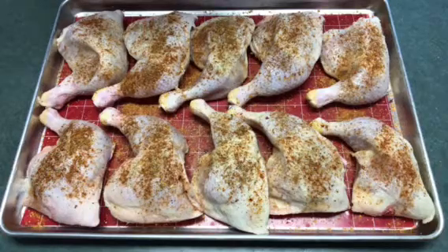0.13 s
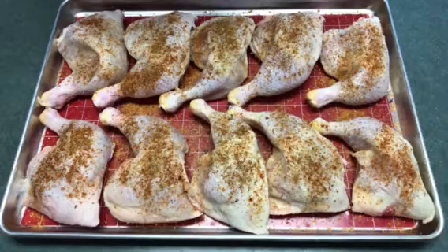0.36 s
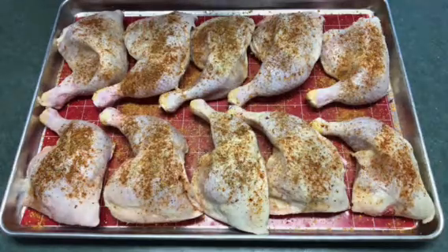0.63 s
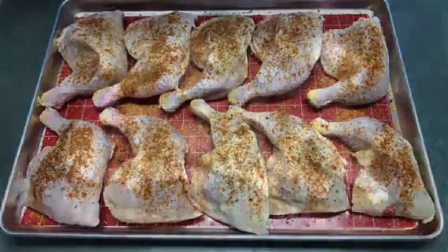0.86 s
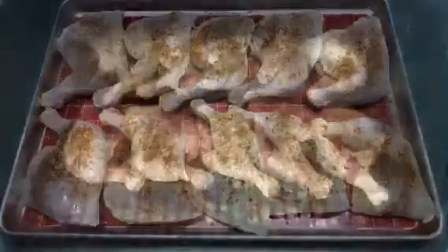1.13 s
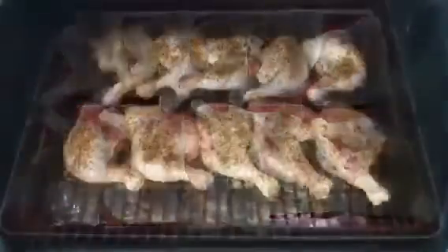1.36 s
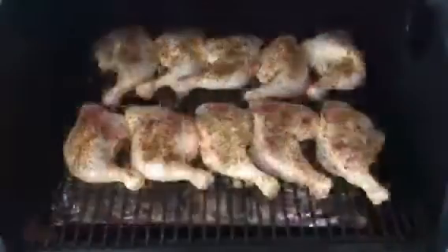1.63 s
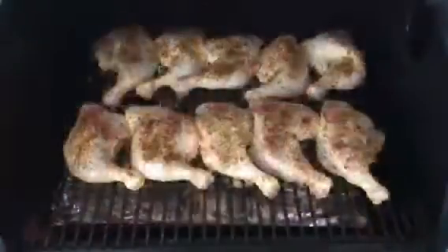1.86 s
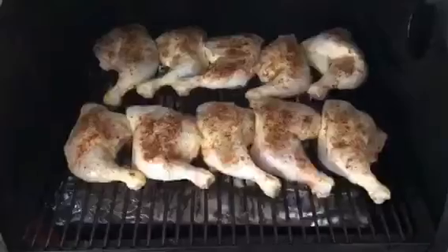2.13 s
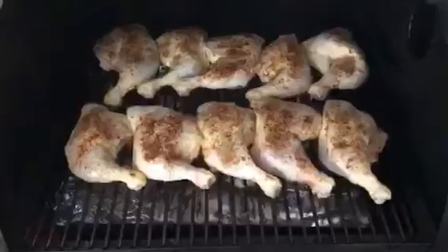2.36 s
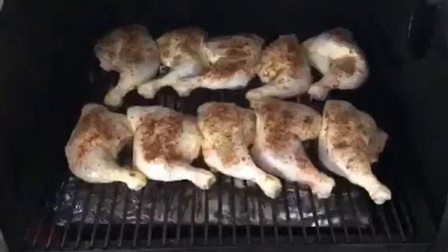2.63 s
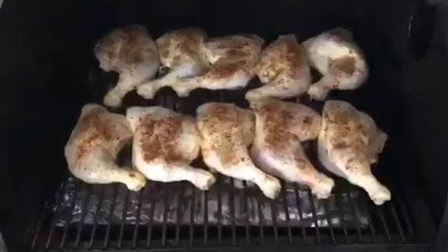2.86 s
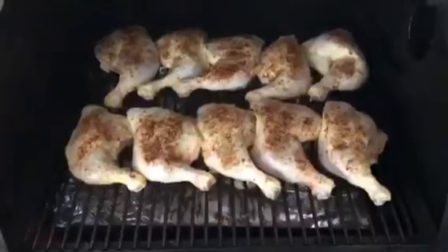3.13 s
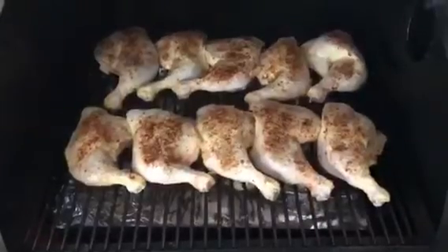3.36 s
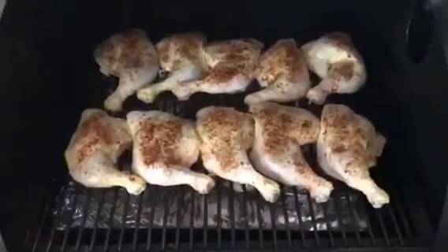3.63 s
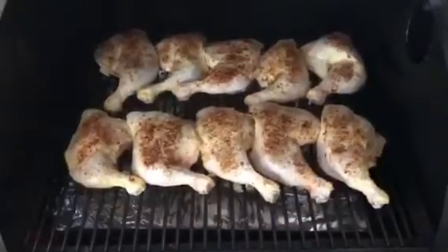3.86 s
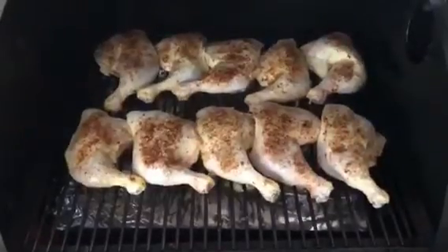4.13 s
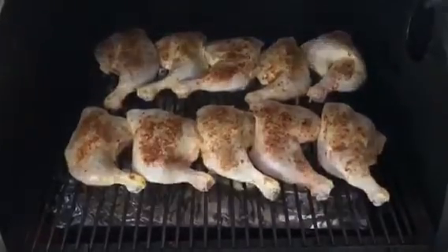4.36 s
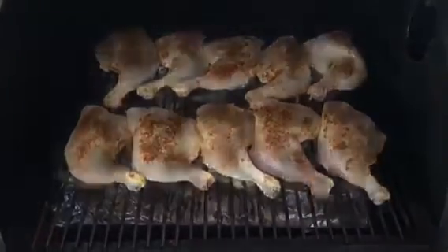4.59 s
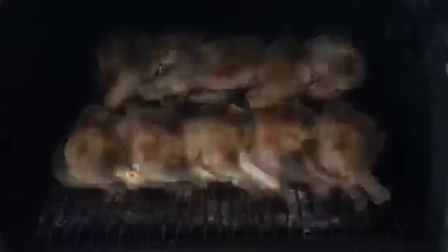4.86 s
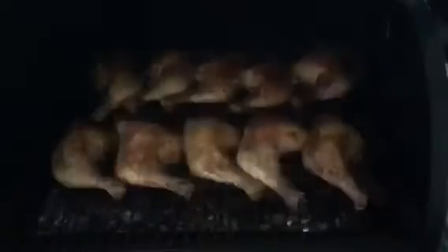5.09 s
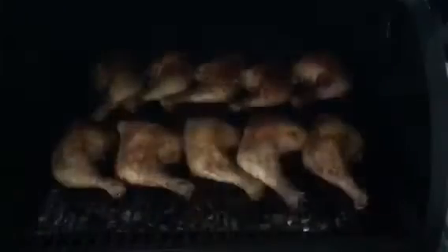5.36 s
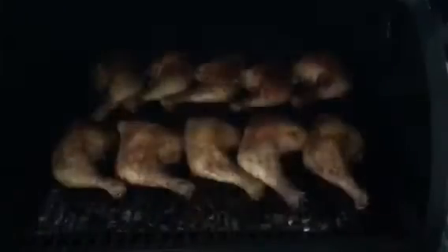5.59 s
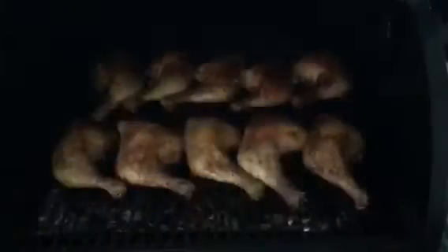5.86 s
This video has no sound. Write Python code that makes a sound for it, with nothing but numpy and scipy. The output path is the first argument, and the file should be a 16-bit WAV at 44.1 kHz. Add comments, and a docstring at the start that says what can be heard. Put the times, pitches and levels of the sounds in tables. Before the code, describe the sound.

For the first 0.6 seconds there is only a very quiet room: soft low room tone, faint appliance hum, a few barely audible gliding chirps, mostly near 0.1-0.3 and 0.4-0.6 seconds, and one tiny tick at 0.2. At about 0.62 a hard cut jumps to a much louder outdoor pellet grill. Flames roar low and steadily, over a wavering, lumpy hum around 140 hertz. Fan-driven air rushes through the duct with hollow midrange resonances and thin fan tones. Fat drops on a hot tray spit in short bright bursts, several each second, with a stronger one near 2.0, over faint fine sizzle. At 4.23 a sharp snap marks another cut: frying hiss and duct air become clearly louder, then the frying slowly eases. Strong spits come near 4.4 and 5.1; the roar swells around 5.1, drops by 5.35, and continues to the end at about 6 seconds.

```python
"""A pellet grill roars outdoors, after a hard cut from a quiet room with faint chirps and one tick.
The fan feeds the fire: the flame roars low, as shaped noise, over a wavering low hum of narrow noise.
Air rushes through the duct: noise with air resonances and narrow fan tones.
Fat on the hot drip tray hisses as dense random puffs and spits in short bright noise bursts.
A later cut to a second shot brings louder frying and duct air."""
import sys
import numpy as np
from scipy import signal
from scipy.fft import rfft, irfft
from scipy.io import wavfile
from scipy.ndimage import uniform_filter1d

SR = 44100
rng = np.random.default_rng(int(sys.argv[2]) if len(sys.argv) > 2 else 0)


def master_out(mix):
    """Clip the mix to full scale and print it as 16-bit PCM to the path in sys.argv[1]."""
    frames = np.transpose(np.atleast_2d(mix))
    ceiling = np.clip(frames, -1, 1)
    pcm = np.round(ceiling * 32767).astype(np.int16)
    wavfile.write(sys.argv[1], SR, pcm)


def makeup_ratio(level_db):
    """Linear amplitude ratio for a level in decibels (20 dB per factor of ten)."""
    decades = np.asarray(level_db, float) / 20
    return 10 ** decades


N = 263786


def rms_one(x):
    """Scale to an rms of 1."""
    return x / np.sqrt(np.mean(x ** 2) + 1e-20)


def in_time(rows):
    """Interpolate each column after the first over the time in the first."""
    time_s, *columns = np.transpose(rows)
    return [np.interp(np.arange(N) / SR, time_s, column) for column in columns]


def colour(points, modes=()):
    """Gain per FFT bin: a smooth spectrum plus the power of some resonances."""
    hz = np.maximum(np.fft.rfftfreq(N, 1 / SR), 1)
    point_hz, point_db = np.transpose(points)
    power = makeup_ratio(np.interp(np.log(hz), np.log(point_hz), point_db)) ** 2
    for mode_hz, width_hz, db in modes:
        power = power + makeup_ratio(db) ** 2 / (1 + (2 * (hz - mode_hz) / width_hz) ** 2) ** 2
    return np.sqrt(power)


def noise(gain):
    """White noise shaped by gain, rms 1."""
    return rms_one(irfft(gain * rfft(rng.standard_normal(N)), N))


def drift(corner_hz):
    """Slow noise of rms 1: every 40th sample through a double one-pole low-pass."""
    pole = np.exp(-2 * np.pi * corner_hz * 40 / SR)
    white = rng.standard_normal(N // 40 + 2002)
    slow = signal.lfilter([1], [1, -2 * pole, pole ** 2], white)[2000:]   # drop the run-in
    return np.interp(np.arange(N) / 40, np.arange(len(slow)), rms_one(slow))


# room tone spectrum: freq_hz, relative_db_per_hz
ROOM_SPECTRUM = [(18, -39), (30, -17), (53, -1), (139, -4.5), (355, -1.5), (394, -11), (716, -16),
                 (953, -13), (1140, -17), (1410, -15), (2130, -22), (5300, -24.5), (15000, -37)]
ROOM_END_DB, ROOM_SINK_DB, ROOM_SINK_S = -63.5, 4.5, 0.08


def room_tone():
    """Shaped noise whose level sinks exponentially at the start and drifts slightly."""
    sink_db = ROOM_SINK_DB * np.exp(-np.arange(N) / SR / ROOM_SINK_S)
    return makeup_ratio(ROOM_END_DB + sink_db + 0.36 * drift(3.4)) * noise(colour(ROOM_SPECTRUM))


# steady appliance tones: pitch_hz, rms_db
APPLIANCE_TONES = [(59.2, -78), (91.5, -74), (242.2, -76), (360.7, -74)]


def appliance_hum():
    """Steady sines of appliances in the room."""
    t = np.arange(N) / SR
    return sum(makeup_ratio(db) * np.sqrt(2) * np.sin(2 * np.pi * hz * t) for hz, db in APPLIANCE_TONES)


# gliding tones: start_s, length_s, first_pitch_hz, last_pitch_hz, level_db
CHIRP_EVENTS = [(.108, .11, 1385, 1362, -70), (.29, .13, 945, 932, -73), (.265, .22, 5440, 5435, -87),
                (.365, .05, 3700, 3690, -82), (.466, .04, 1200, 1330, -69), (.472, .07, 1350, 1480, -70),
                (.49, .07, 1600, 1700, -75), (.5, .08, 1320, 1270, -72)]


def chirps():
    """Faint gliding sines, roughened by random level and phase."""
    out = np.zeros(N)
    rough, wobble_rad = makeup_ratio(3.0 * drift(60.0)), 0.5 * drift(60.0)
    for start_s, length_s, first_hz, last_hz, db in CHIRP_EVENTS:
        n, i = round(length_s * SR), round(start_s * SR)
        phase = 2 * np.pi * np.cumsum(np.linspace(first_hz, last_hz, n)) / SR
        swell = np.sqrt(2 * np.sin(np.pi * np.linspace(0, 1, n) ** 0.5))   # early peak
        tone = np.sin(phase + wobble_rad[i:i + n])
        out[i:i + n] += makeup_ratio(db) * swell * rough[i:i + n] * tone
    return out


TICK_S, TICK_DB, TICK_DECAY_S = 0.217, -62, 0.0033


def tick():
    """One tiny decaying burst of noise centred near 5 kHz."""
    t = np.arange(N) / SR
    envelope = (t > TICK_S) * np.exp(-np.abs(t - TICK_S) / TICK_DECAY_S)
    return makeup_ratio(TICK_DB) * envelope * noise(colour([(4000, -30), (5200, 4), (7000, -8), (9000, -25)]))


# level curve of the randomly wavering low hum: time_s, level_db
HUM_LEVEL = [(0.64, -29), (0.91, -34.5), (0.94, -20.5), (1.05, -39.5), (1.1, -21), (1.2, -31),
             (2.01, -27.5), (2.28, -33.5), (2.48, -21), (2.91, -34.5), (3.0, -22.5), (3.14, -27),
             (5.28, -28), (5.35, -48), (5.44, -26.5), (5.74, -40), (5.77, -26), (5.98, -29.5)]
HUM_HZ, HUM_WIDTH_HZ, HUM_EVENING = 141.8, 19.2, 0.43


def low_hum():
    """Narrow noise at one resonance, its random swing partly evened, follows a level curve."""
    tone = noise(colour([(10, -90), (20000, -90)], [(HUM_HZ, HUM_WIDTH_HZ, 0)]))
    swing = np.sqrt(uniform_filter1d(tone ** 2, size=900) + 0.063)
    return makeup_ratio(in_time(HUM_LEVEL)[0]) * rms_one(tone / swing ** HUM_EVENING)


# draught before trims: time_s, flame_roar_db, duct_air_db
DRAUGHT_LEVELS = [(0.64, -32, -43.5), (0.9, -30, -44), (2.0, -33, -44.5), (2.4, -31.5, -44.5),
                  (3.5, -33, -45), (4.21, -31.5, -44), (4.235, -31, -40), (4.5, -31.5, -40),
                  (5.1, -28.5, -39.5), (5.35, -36, -42.5), (5.98, -34, -43)]
ROAR_TRIM_DB, DUCT_TRIM_DB = 2.5, 0.5
# flame roar spectrum: freq_hz, relative_db_per_hz
ROAR_SPECTRUM = [(25, -32), (40, -28), (55, -6), (72, -15.5), (85, -14), (100, -9), (125, -2.5), (170, 1),
                 (210, -3), (260, -6.5), (310, -4), (365, -9.5), (420, -26), (500, -60)]
# duct air spectrum: freq_hz, relative_db_per_hz
DUCT_SPECTRUM = [(300, -11.5), (480, -9), (1000, -7.5), (1600, -11.5), (2400, -16.5), (3900, -22),
                 (4800, -30), (6300, -30), (7800, -39), (16000, -68)]
# air resonances of duct and barrel: pitch_hz, width_hz, relative_db
AIR_MODES = [(565, 20, -3), (644, 58, -0.5), (728, 69, -4.5), (847, 47, 3), (942, 68, -2.5),
             (1147, 57, 2.5), (1209, 46, 1), (1262, 39, 4.5), (1392, 50, -4.5), (1729, 50, -5.5),
             (2047, 140, -13)]
# narrow tones of blades and motor: pitch_hz
FAN_PITCHES = [460, 691, 2812]
# their strengths: relative_db
FAN_STRENGTHS = [0.5, 5, -11.5]


def grill_air():
    """Flame roar and duct air as shaped noise; one flame flutter moves both."""
    roar_db, duct_db = in_time(DRAUGHT_LEVELS)
    flutter = drift(22.7)
    roar_db = roar_db + ROAR_TRIM_DB + 0.85 * flutter + 1.1 * drift(6.8)
    duct_db = duct_db + DUCT_TRIM_DB + 1.03 * flutter + 0.37 * drift(33.0)
    fan_tones = [(hz, 9, db) for hz, db in zip(FAN_PITCHES, FAN_STRENGTHS)]   # 9 Hz wide
    roar = makeup_ratio(roar_db) * noise(colour(ROAR_SPECTRUM))
    duct = makeup_ratio(duct_db) * noise(colour(DUCT_SPECTRUM, list(AIR_MODES) + fan_tones))
    return roar + duct


# sizzle spectrum: freq_hz, relative_db_per_hz
HISS_SPECTRUM = [(1500, -9), (3000, 4), (6000, 1.5), (7700, -1), (9300, 1), (10500, -4), (12000, -2),
                 (14800, 0), (16000, -4.5)]
# sizzle level, used up to SECOND_SHOT_S: time_s, level_db
SIZZLE_LEVEL = [(.62, -54.5), (.75, -77), (2.0, -68), (2.5, -86), (2.7, -61.5), (3.3, -65), (3.5, -69),
                (4.22, -66)]
# borders of the bands in which drops hiss: edge_hz
DROP_BAND_EDGES = [1200, 4500, 8500, 16500]
DROPS_PER_S, DROP_DECAY_S = 60.0, 0.0018   # rate per band; decay of puff power
# a cut to a second shot with louder frying, which then sags
SECOND_SHOT_S, FRYING_DB, FRYING_SAG_DB_PER_S = 4.2275, -54.5, 1.4


def sizzle():
    """Tiny drops burst at random, each a puff of a few ms in one band, over an even hiss."""
    spectrum, hz = rfft(noise(colour(HISS_SPECTRUM))), np.fft.rfftfreq(N, 1 / SR)
    out, swell = 0, makeup_ratio(1.4 * drift(5.1))
    for low_hz, high_hz in zip(DROP_BAND_EDGES, DROP_BAND_EDGES[1:]):
        sizes = makeup_ratio(6.3 * np.minimum(rng.exponential(1, N), 2.8))
        drops = sizes * (rng.random(N) < DROPS_PER_S / SR)
        decay = np.exp(-1 / (DROP_DECAY_S * SR))
        puff_power = signal.lfilter([1], [1, -decay], drops ** 2 + 1e-18)
        band = irfft(spectrum * (hz >= low_hz) * (hz < high_hz), N)
        out = out + np.sqrt(puff_power + 3.3) * band   # 3.3: power of the even hiss
    since_cut_s = np.arange(N) / SR - SECOND_SHOT_S
    frying_db = FRYING_DB - FRYING_SAG_DB_PER_S * since_cut_s
    level_db = np.where(since_cut_s < 0, in_time(SIZZLE_LEVEL)[0], frying_db)
    return makeup_ratio(level_db) * rms_one(swell * out)


# fat spits: start_s, level_db, decay_s, body_db (relative to level_db)
SPIT_EVENTS = [(0.792, -43, 0.0071, -8), (0.9357, -53.5, .0057, -8), (0.996, -44.5, .0046, -14),
               (1.015, -43, .0041, 2), (1.1044, -52, .0087, 0), (1.194, -45.5, .0067, -18),
               (1.2644, -49.5, .0031, 1), (1.2879, -48, .0066, -16), (1.4284, -43.5, .0076, -13),
               (1.602, -44, 0.0077, -13), (1.613, -51, 0.0033, 9.5), (1.6625, -57, .008, -14),
               (1.767, -44, .0068, -17), (1.79, -53, .0049, -10), (1.907, -45, .0068, -13),
               (2.0142, -49, .0045, -10), (2.042, -36.5, 0.012, -5.5), (2.1984, -45.5, 0.0065, -10),
               (2.3016, -46, 0.0066, -19), (2.338, -58, 0.015, -10), (2.423, -47, 0.0066, -20),
               (2.529, -52.5, 0.0057, 8), (2.582, -46, 0.0051, -16), (2.6648, -42, .008, -8),
               (2.729, -52, 0.0033, -1), (2.7366, -48, .0052, -18), (2.804, -50.5, .0062, 2.5),
               (2.841, -48, 0.0061, -4), (2.9073, -52, 0.0089, -14), (3.047, -52.5, 0.0097, -4),
               (3.1462, -49.5, 0.0095, -15), (3.192, -51, .003, -2), (3.197, -42.5, 0.0064, -6),
               (3.296, -54, .004, -12), (3.544, -54.5, 0.015, -4), (3.774, -46.5, 0.0094, -2.5),
               (3.9394, -47, 0.0062, -2), (4.0222, -54, .0034, -7), (4.128, -41.5, 0.0039, -3),
               (4.2087, -60, 0.0019, -11), (4.2265, -34, 0.0036, 1), (4.293, -51, .0085, -3),
               (4.337, -45.5, 0.02, -4), (4.3796, -46, .0049, -5), (4.387, -38, 0.01, -5.5),
               (4.6025, -46.5, .01, -3), (4.7317, -53, .0094, 7), (4.766, -46, 0.0089, -3),
               (4.923, -48, 0.0066, 5.5), (5.0665, -41.5, 0.0083, -4), (5.1179, -32.5, 0.0038, -5),
               (5.2848, -55, .01, -9), (5.35, -39.5, 0.0042, -19), (5.383, -42, .0023, -1),
               (5.4195, -54, 0.0063, -5), (5.4323, -46, 0.0068, 5), (5.4669, -47, .0035, -14),
               (5.686, -55, .015, -5), (5.7457, -46.5, 0.0045, -1), (5.846, -49, .004, -5)]
# steam spectrum: freq_hz, relative_db_per_hz
STEAM_SPECTRUM = [(3000, -16), (5000, -2), (6000, 1), (7700, -2), (9000, 0), (10500, -3), (12800, 2),
                  (16000, -2)]
# body spectrum: freq_hz, relative_db_per_hz
BODY_SPECTRUM = [(400, -29), (1000, -2), (1800, -5.5), (3000, 5.5), (4500, 5), (6500, -20), (9000, -40)]
RING_LOW_HZ, RING_HIGH_HZ, RING_WIDTH_HZ = 4000, 13000, 1800   # one random region per burst
SPIT_RISE_S, KNOCK_DECAY_S = 0.00064, 0.0021


def spits():
    """Each big drop bursts into steam: a crack, a short body, a weak tail, and a knock of the tray."""
    out, steam, body = np.zeros(N), noise(colour(STEAM_SPECTRUM)), noise(colour(BODY_SPECTRUM))
    for edge_hz in (6000.0, 10000.0):   # the treble of the steam wanders
        high = signal.sosfilt(signal.butter(2, edge_hz, "high", fs=SR, output="sos"), steam)
        steam = steam + (makeup_ratio(3.4 * drift(25.0)) - 1) * high
    knock = noise(colour([(300, -16), (800, 6), (2200, -1), (4000, -19)]))
    t = np.arange(int(0.15 * SR)) / SR
    rings_hz = RING_LOW_HZ * (RING_HIGH_HZ / RING_LOW_HZ) ** rng.random(len(SPIT_EVENTS))
    for (start_s, db, decay_s, body_db), ring_hz in zip(SPIT_EVENTS, rings_hz):
        i = round(start_s * SR)
        span = slice(i, i + len(t))
        crack = 0.29 * np.exp(-t / (0.1 * decay_s))
        tail = 0.062 * np.exp(-t / (8.0 * decay_s))
        fall = crack + np.exp(-t / decay_s) + tail
        shape = (1 - np.exp(-t / SPIT_RISE_S)) * fall
        puff = steam[span]
        ring = signal.lfilter(*signal.iirpeak(ring_hz, ring_hz / RING_WIDTH_HZ, fs=SR), puff)
        out[span] += makeup_ratio(db) * shape[:N - i] * (puff + ring + makeup_ratio(body_db) * body[span])
        out[span] += makeup_ratio(db + body_db + 2.0) * np.exp(-t / KNOCK_DECAY_S)[:N - i] * knock[span]
    return out


CUT_S, CUT_FADE_S = 0.6245, 0.00042


def scene():
    """The room, then a hard cut to the grill."""
    outdoors = np.clip((np.arange(N) / SR - CUT_S) / CUT_FADE_S, 0, 1)
    room = room_tone() + appliance_hum() + chirps() + tick()
    grill = low_hum() + grill_air() + sizzle() + spits()
    return (outdoors * grill + (1 - outdoors) * room)[None]


def roll_off(x):
    """The treble ends steeply here."""
    return signal.sosfilt(signal.butter(12, 15820, fs=SR, output="sos"), x)


def record(dry):
    """A steep low-pass removes the top; its stop band starts at 15.9 kHz."""
    mix = signal.sosfilt(signal.cheby2(12, 50, 15900, fs=SR, output="sos"), dry)
    return roll_off(mix)


dry = scene()
out = record(dry)
master_out(out)
```